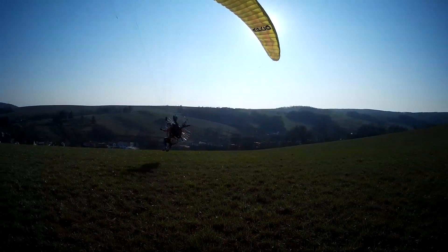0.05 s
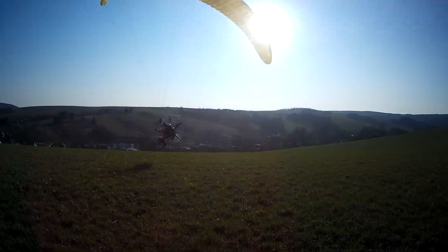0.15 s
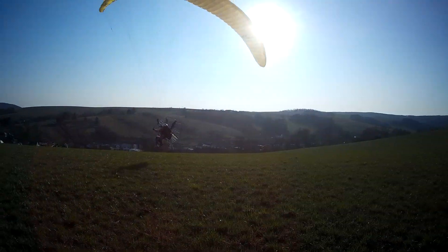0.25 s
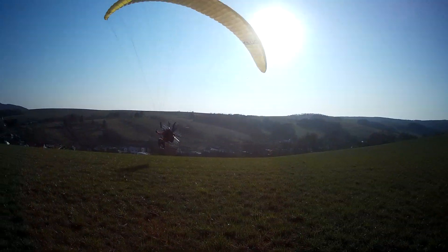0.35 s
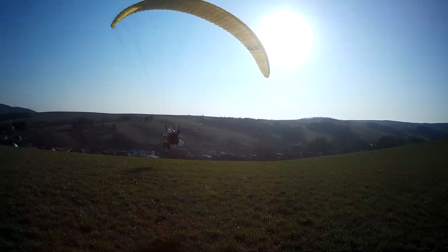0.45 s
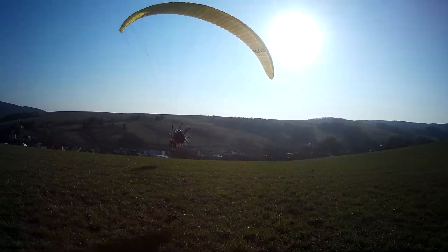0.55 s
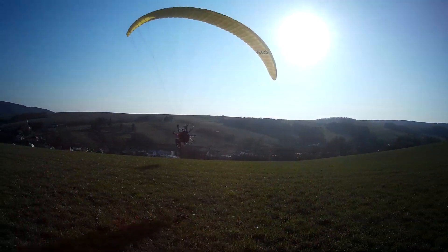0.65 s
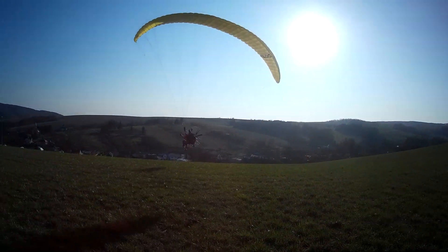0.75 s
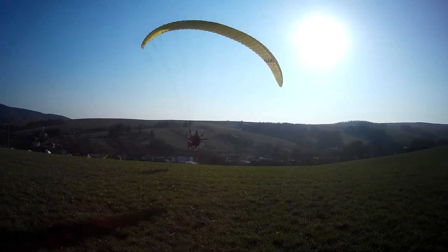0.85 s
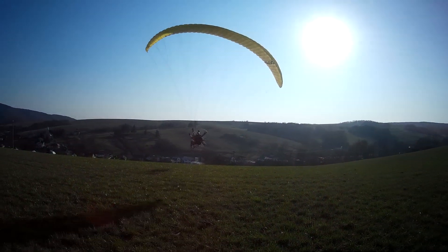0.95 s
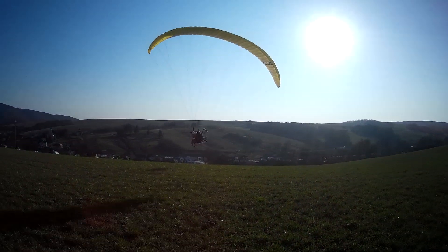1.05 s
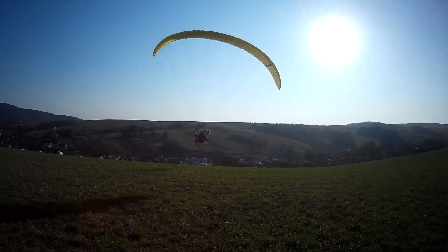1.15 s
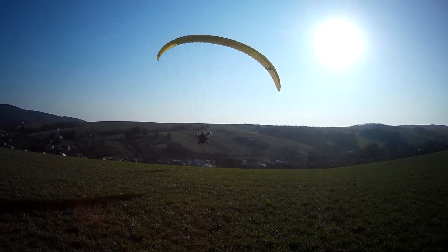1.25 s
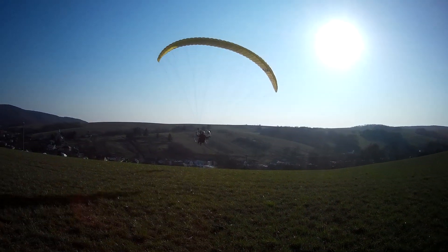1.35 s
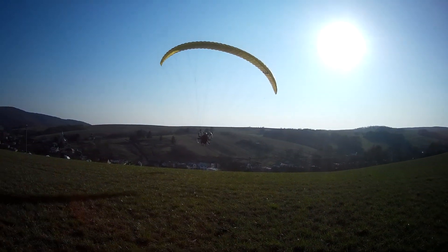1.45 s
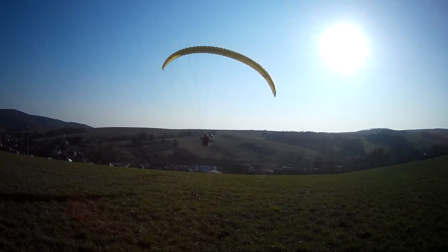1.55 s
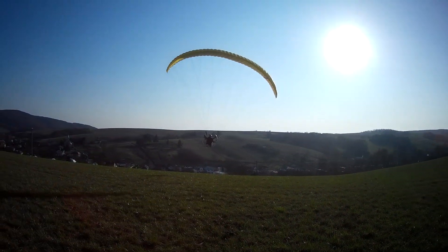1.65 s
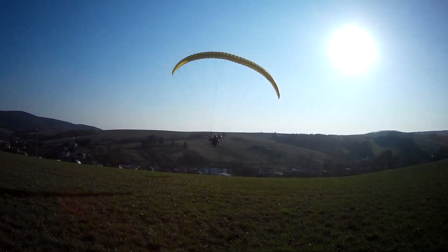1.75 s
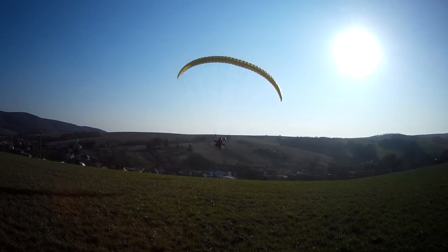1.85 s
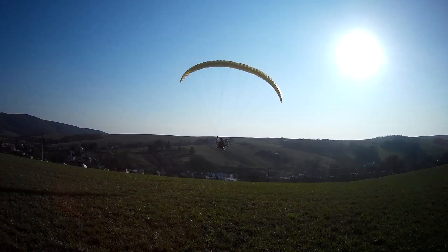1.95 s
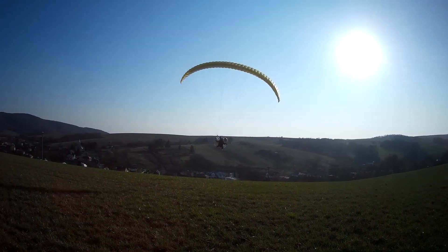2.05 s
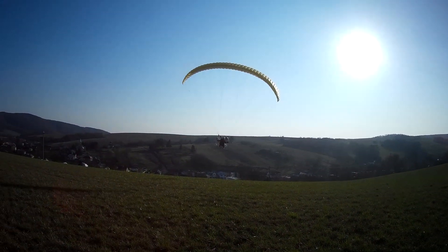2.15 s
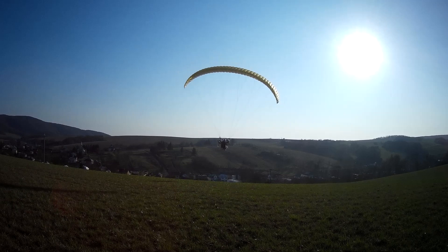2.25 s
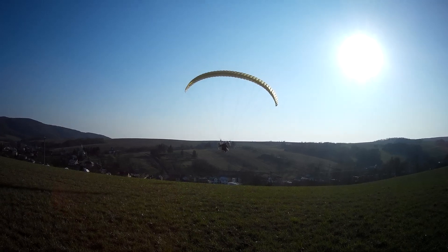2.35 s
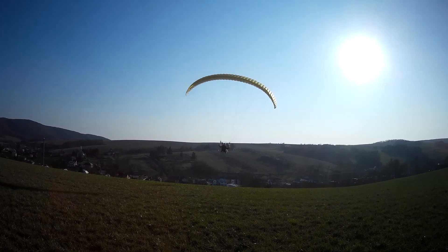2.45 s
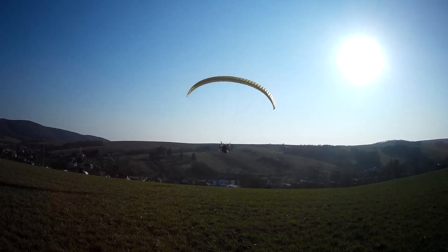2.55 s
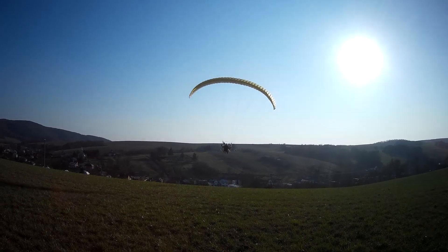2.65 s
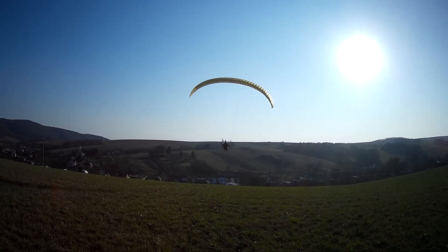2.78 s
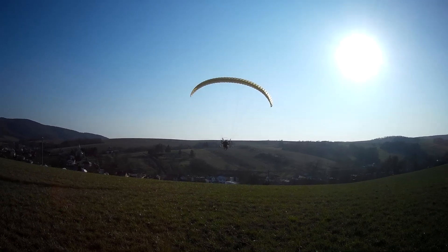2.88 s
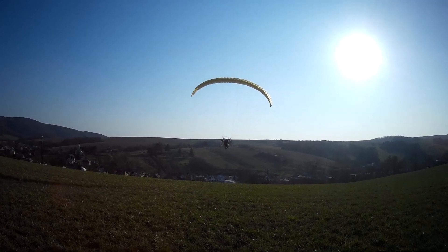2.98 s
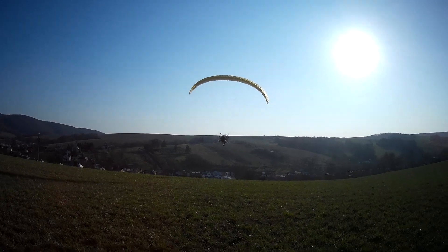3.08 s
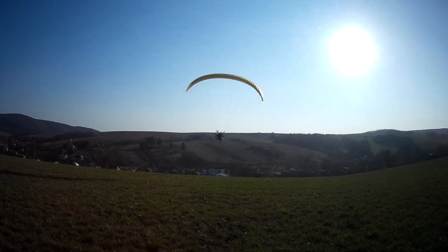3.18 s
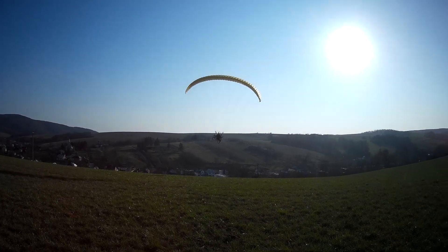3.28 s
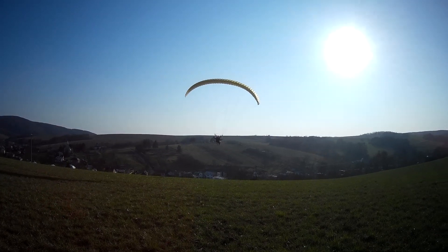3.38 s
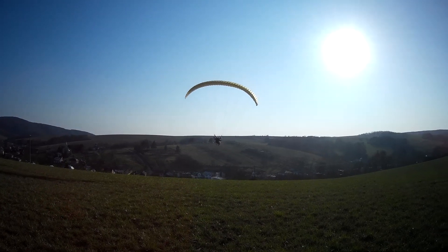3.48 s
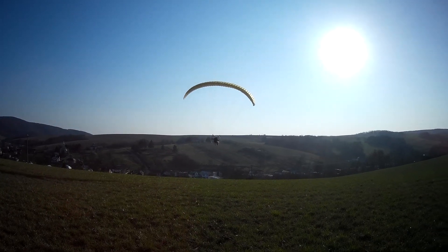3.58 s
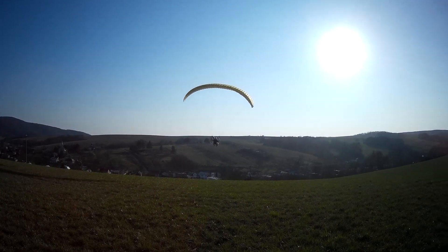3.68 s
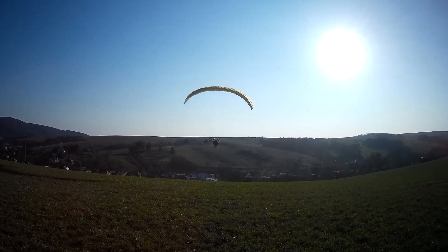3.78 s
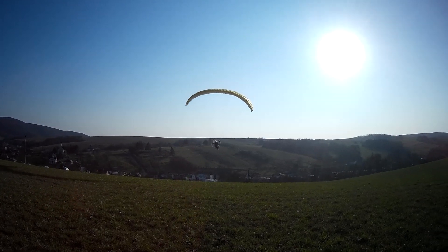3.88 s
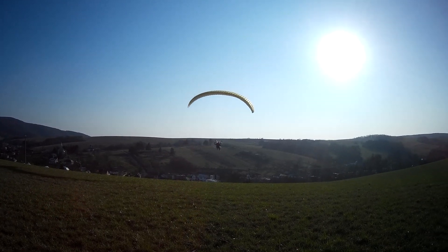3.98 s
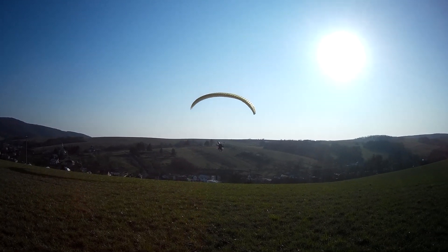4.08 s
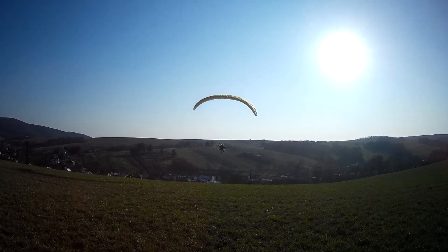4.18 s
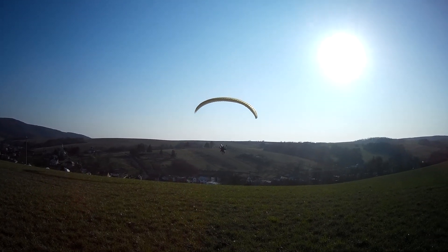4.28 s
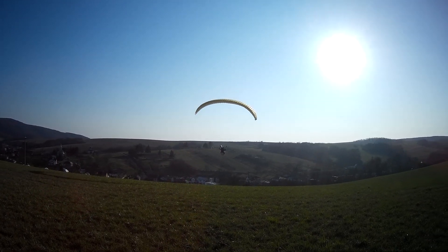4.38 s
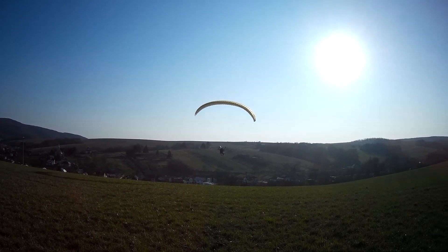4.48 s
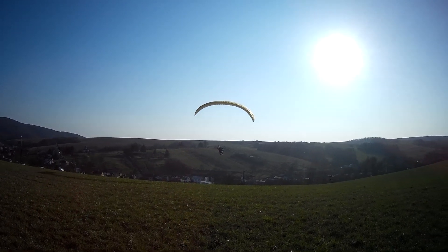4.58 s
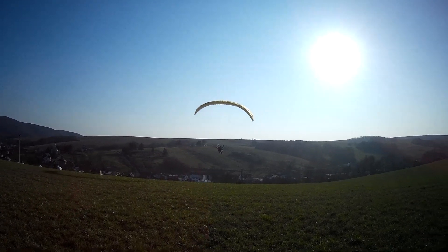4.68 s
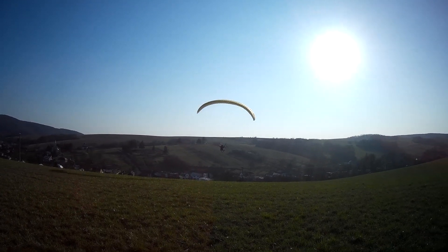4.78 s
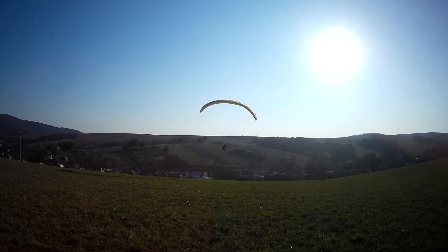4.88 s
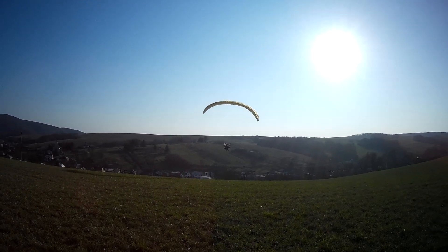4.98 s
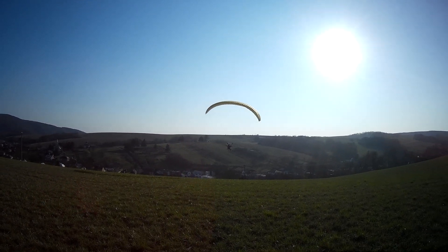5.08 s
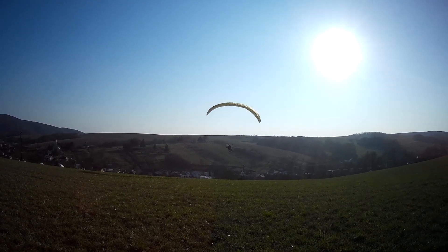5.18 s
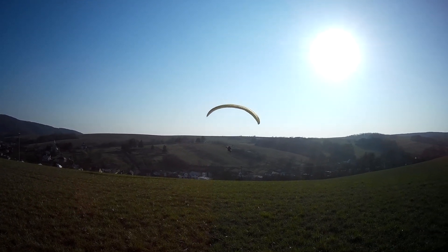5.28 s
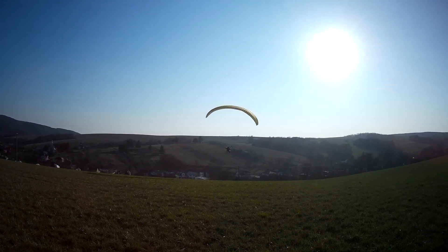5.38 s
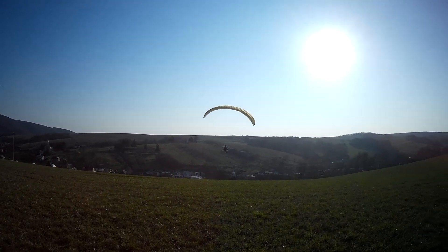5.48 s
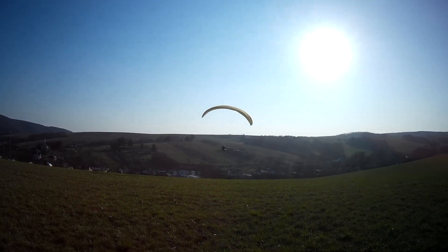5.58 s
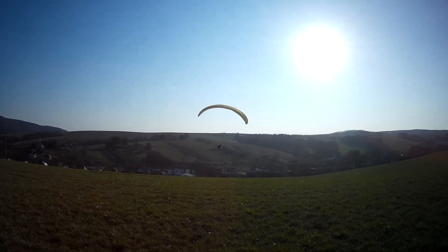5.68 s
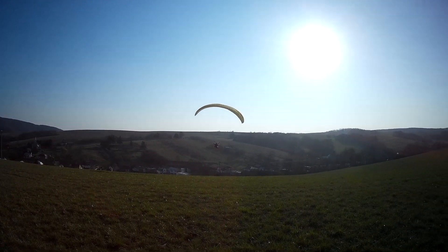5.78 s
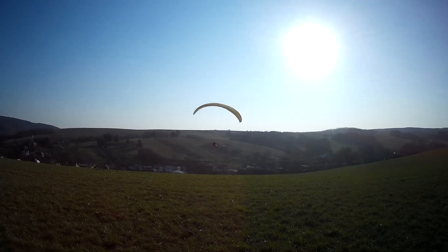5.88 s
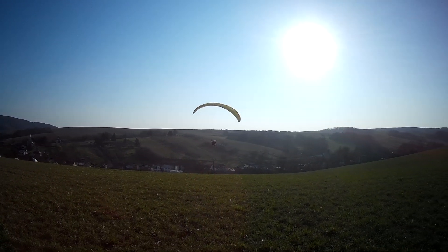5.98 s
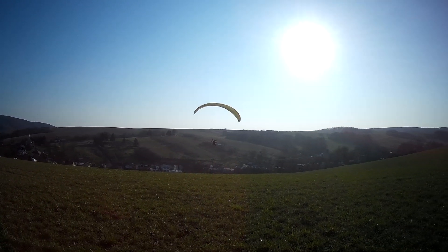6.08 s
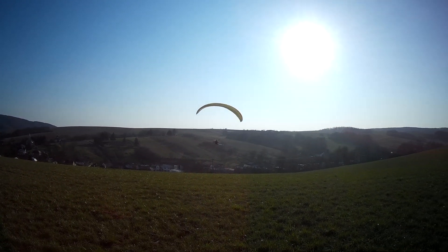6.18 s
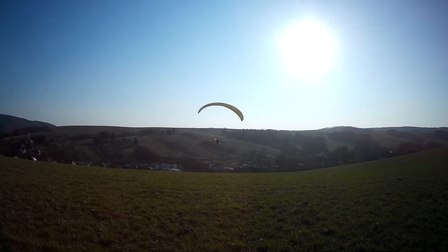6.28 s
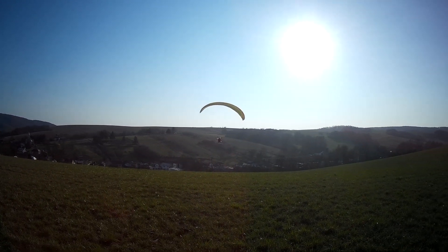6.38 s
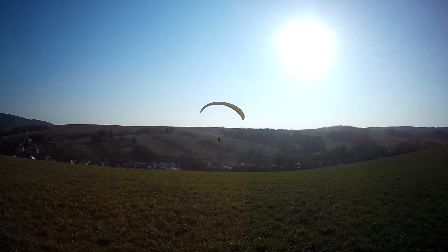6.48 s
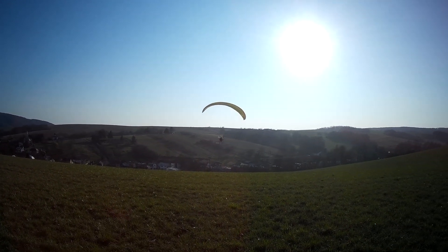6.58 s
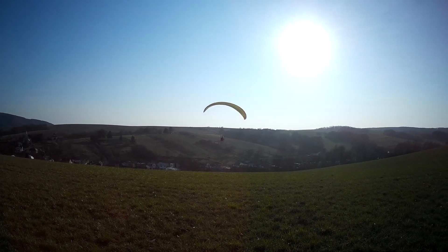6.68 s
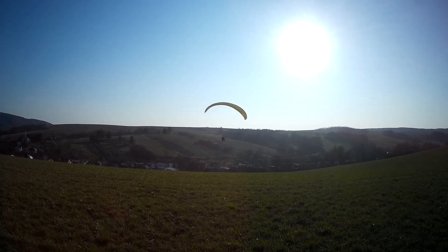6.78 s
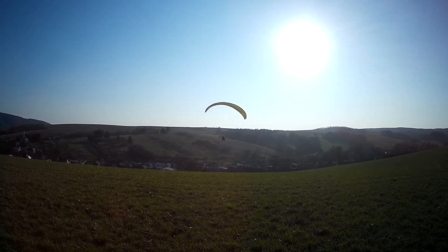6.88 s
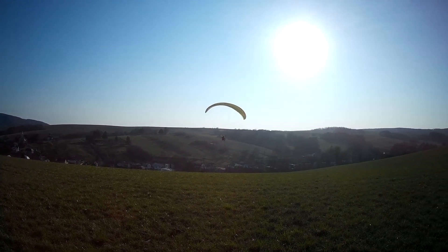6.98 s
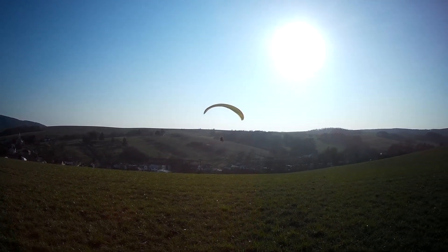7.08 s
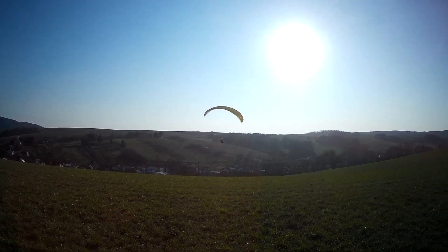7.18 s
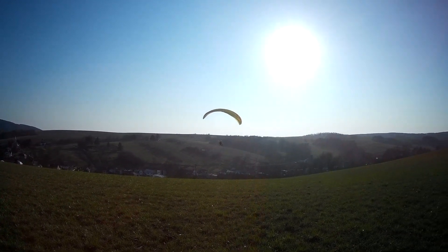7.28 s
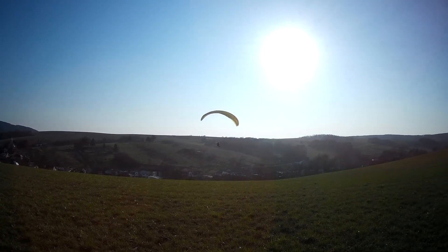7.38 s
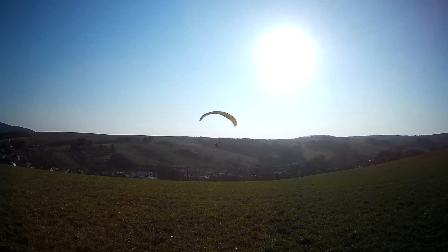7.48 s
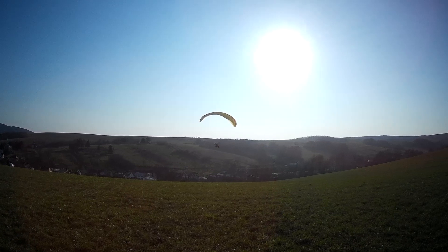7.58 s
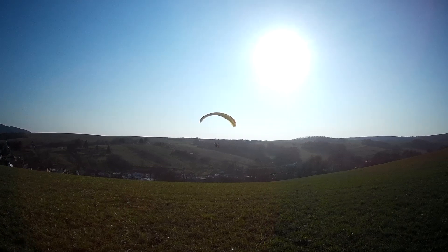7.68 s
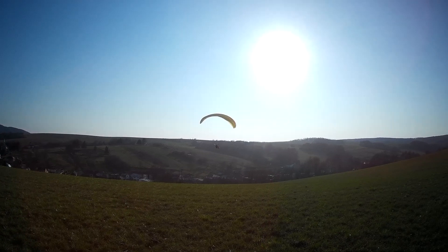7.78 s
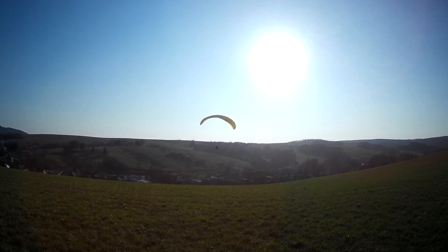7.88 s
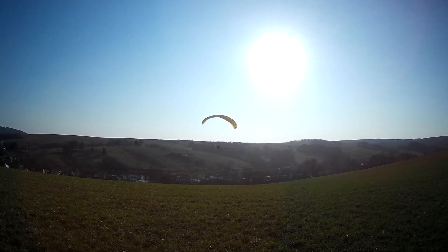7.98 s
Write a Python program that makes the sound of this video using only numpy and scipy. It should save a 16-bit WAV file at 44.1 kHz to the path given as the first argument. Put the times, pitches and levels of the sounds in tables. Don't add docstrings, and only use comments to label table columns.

```python
import sys
import numpy as np
from scipy import signal
from scipy.fft import rfft, irfft, next_fast_len
from scipy.io import wavfile
from scipy.ndimage import uniform_filter1d

SR = 44100
rng = np.random.default_rng(int(sys.argv[2]) if len(sys.argv) > 2 else 0)


def master_out(mix):
    frames = np.transpose(np.atleast_2d(mix))
    ceiling = np.clip(frames, -1, 1)
    pcm = np.round(ceiling * 32767).astype(np.int16)
    wavfile.write(sys.argv[1], SR, pcm)


def decibels_to_gain(level_db):
    exponent = np.asarray(level_db, float) / 20
    return 10 ** exponent


N = 355005
STEP = 128
COOL_S = 0.83


def evened(x):
    return x / np.sqrt(np.mean(x ** 2) + 1e-20)


def read(points, hz):
    f, value = np.transpose(points)
    return np.interp(np.log(hz + 1), np.log(f + 1), value)


def columns(rows, t):
    s, *values = np.transpose(rows)
    return [np.interp(t, s, v) for v in values]


def control_times():
    return np.arange(N // STEP + 2) * STEP / SR


def swell(t, s, half_s):
    return np.exp(-np.square(np.square((t - s) / half_s)))


def rise(t, s, width_s):
    return 1 / (1 + np.exp((s - t) / width_s))


def wander(rate_hz, count):
    width = max(int(SR / STEP / rate_hz), 1)
    x = rng.standard_normal((count, N // STEP + 2))
    return evened(uniform_filter1d(uniform_filter1d(x, width), width))


def noise(points, patchy_db):
    hz = np.fft.rfftfreq(1024, 1 / SR)
    a, b, patches = rng.standard_normal((N // 256 + 5, 513, 3)).T
    patches = evened(uniform_filter1d(uniform_filter1d(patches, 9, 0), 14, 1))
    z = (a + 1j * b) * decibels_to_gain(read(points, hz)[:, None] + patchy_db * patches)
    return evened(signal.istft(z, nperseg=1024, noverlap=768)[1][:N])


def band(x, lo_hz, hi_hz):
    size = next_fast_len(N)
    hz = np.fft.rfftfreq(size, 1 / SR) + 1
    gain = 1 / (1 + (lo_hz / hz) ** 12) / (1 + (hz / hi_hz) ** 12)
    part = irfft(rfft(x, size) * gain, size)[:N]
    return part / np.sqrt(uniform_filter1d(part ** 2, SR // 3, mode="reflect") + 1e-20)


def stack(turns, size, lag, orders, fade_db, drift):
    fades, drifts = wander(7.8, len(orders)), wander(9.0, len(orders))
    out, at = np.zeros(N), np.arange(N) / STEP
    first = np.exp(2j * np.pi * turns)
    wave = first ** orders[0]
    for k, fade, slip in zip(orders, fades, drifts):
        phase = drift * k * slip - 2 * np.pi * lag(k)
        slow = size(k) * decibels_to_gain(fade_db * fade) * np.exp(1j * phase)
        out += (np.interp(at, np.arange(len(slow)), slow) * wave).real
        wave = wave * first
    return out


# (time [s], firing rate [Hz])
THROTTLE = [(0, 117.77), (.38, 116.38), (1.12, 94.48), (1.37, 89.85), (2.06, 84.53), (2.9, 91.25),
            (3.39, 69.56), (3.78, 81.48), (4.11, 81.92), (4.4, 85.24), (4.74, 85.02), (5.04, 82.17),
            (5.46, 94.73), (5.72, 98.39), (6.39, 77.39), (6.9, 77.74), (7.06, 74.16), (8.05, 71.46)]
INERTIA_S = .125
GEAR, BLADE_LAG_S, CREEP_HZ_PER_S = 1.04567, .0146, .0078
SLIP_HZ, GRIP_AT_S, GRIP_S = 3.21, .521, .2


def speeds(t):
    width = round(INERTIA_S / (t[1] - t[0]))
    fire_hz = columns(THROTTLE, t)[0]
    for _ in range(2):
        fire_hz = uniform_filter1d(fire_hz, width, mode="nearest")
    slip_hz = SLIP_HZ * rise(-t, -GRIP_AT_S, GRIP_S) + CREEP_HZ_PER_S * t
    return GEAR * fire_hz - BLADE_LAG_S * np.gradient(fire_hz, t) - slip_hz, fire_hz


def shafts():
    t = control_times()
    blade_hz, fire_hz = (np.interp(np.arange(N) / SR, t, hz) for hz in speeds(t))
    return np.cumsum(blade_hz) / SR + .84, np.cumsum(fire_hz) / SR + .29


# (time [s], level [dB], clear line of sight to the engine [dB], pipe mouth facing the listener [dB])
FLIGHT = [(0, -9.5, 4, 10), (.35, -12, 4, -1), (1, -17, 0, -14), (1.25, -17, -3.5, -18),
          (1.9, -19.5, 4.5, 1), (2.75, -21, 5, -41), (3.3, -24.5, -3, -3), (3.65, -24.5, -2.5, -6),
          (3.8, -24.5, 2.5, 9), (4.15, -24.5, 0.5, 15.5), (4.68, -25, -0.5, -5), (5.05, -21.5, -3, -25),
          (5.6, -25, 3.5, -13), (6.1, -28.5, 4, -19), (6.5, -26.5, -1, 12), (7, -23.5, -1, 24),
          (7.4, -24.5, -5, 20), (8.05, -28, -2, 17.5)]


def flight(t):
    return columns(FLIGHT, t)


def eddies(t):
    return 1 - 0.4 * swell(t, 0, COOL_S)


def blade_lag(k):
    return 0.27 * (k % 2) + 0.01121 * (k - 2) ** 2 if k > 1 else -.15


# (frequency [Hz], level [dB])
BLADES = [(300, -49), (455, -20), (510, -13.5), (555, -8), (720, -5.5), (900, -11), (1200, -10),
          (1650, -13.5), (2100, -20.5), (2700, -38), (3100, -31.5), (3600, -38)]
BLADE_DB, MOUTH_MASKS = -2, 0.11


def blade_tones(turns):
    t = control_times()
    blade_hz = speeds(t)[0]
    blade_db = BLADE_DB - MOUTH_MASKS * flight(t)[2]
    odd_db = np.interp(t, [0, 1, 2.5, 6, 7], [4.5, -4, -6.0, -2.5, -7])
    stretch = 0.97 + 0.014 * t

    def size(k):
        return decibels_to_gain(read(BLADES, k * blade_hz / stretch) + blade_db + odd_db * (k % 2))

    return stack(turns, size, blade_lag, range(5, 28), 2.0 * eddies(t), 0.041 * eddies(t))


def fire_lag(k):
    return 0.01638 * (k - 2) ** 2


# (frequency [Hz], level [dB])
EXHAUST = [(300, 7.5), (450, -35), (560, -21.5), (700, -32), (850, -10.5), (1200, -11.5), (1700, -26),
           (2100, -55), (2700, -47), (3100, -55), (3600, -45)]
# (frequency [Hz], width [Hz], level [dB])
PIPE = [
    (647, 64, 4),
    (1406.4, 80, -13.5),
]
FIRE_DB, HOT_FIRE_DB, FIRE_LOSS_DB_PER_S = -2.5, 3, 1.01
HOT_TUNE = 0.16
SAG_TUNE, SAG_AT_S, SAG_S = 0.061, 1.14, 0.3


def exhaust_tones(turns):
    t = control_times()
    fire_hz, mouth_db = speeds(t)[1], flight(t)[2]
    hot = swell(t, 0, COOL_S)
    fire_db = FIRE_DB + HOT_FIRE_DB * hot - FIRE_LOSS_DB_PER_S * t
    tune = 1 + HOT_TUNE * hot - SAG_TUNE * swell(t, SAG_AT_S, SAG_S)

    def size(k):
        ring = 0
        for n, (hz, width_hz, db) in enumerate(PIPE):
            detune = 2 * (k * fire_hz - hz * tune ** (1 - n)) / width_hz
            ring = ring + decibels_to_gain(db + n * mouth_db) / (1 + detune ** 2)
        return (decibels_to_gain(read(EXHAUST, k * fire_hz)) + ring) * decibels_to_gain(fire_db)

    return stack(turns, size, fire_lag, range(5, 28), 2.75 * eddies(t), 0.042 * eddies(t))


def puff_train(blade_turns, fire_turns):
    puffs = np.zeros(N)
    for turns in (2 * blade_turns, fire_turns):
        strength = decibels_to_gain(2.2 * rng.standard_normal(1800))
        puffs += np.exp(-(turns % 1) / 0.4) * strength[turns.astype(int)]
    return uniform_filter1d(puffs, 40)


# (frequency [Hz], density [dB per Hz])
RUSH = [(30, -36), (60, -46), (120, -26), (250, -21), (420, -21), (560, -11.5), (700, -4.5), (1000, -6.5),
        (1300, -3.5), (1650, -2), (1950, -11.5), (2300, -16.5), (2800, -46.5)]


def air_rush(puffs):
    return decibels_to_gain(-4.5) * noise(RUSH, 1.2) * evened(.4 + puffs)


# (time [s], half length [s], intake gain [dB], fizz gain [dB])
FACING = [
    (2.65, 0.46, 3.5, 2),
    (3.9, .15, -6, 10),
]


def facing(t):
    bells = [(swell(t, s, half_s), intake_db, fizz_db) for s, half_s, intake_db, fizz_db in FACING]
    return sum(b * db for b, db, _ in bells), sum(b * db for b, _, db in bells)


# (frequency [Hz], density [dB per Hz])
WHISTLE = [(2600, -37), (2950, -8.5), (3200, -4), (3340, -5), (3480, -9), (3650, -50)]
INTAKE_DB, INTAKE_GAIN_DB_PER_S, INTAKE_SHUT_S = -22.5, 3.5, 7.16


def intake():
    t = np.arange(N) / SR
    shut_db = -16 * rise(t, INTAKE_SHUT_S, 0.1)
    level_db = INTAKE_DB + INTAKE_GAIN_DB_PER_S * t + 0.59 * flight(t)[1] + shut_db + facing(t)[0]
    return decibels_to_gain(level_db) * noise(WHISTLE, 1.4)


# (frequency [Hz], density [dB per Hz])
RASP = [(1800, -16), (2300, -7.5), (2750, -3), (3050, -4), (3350, -4.5), (3650, -11.5), (3900, -11),
        (4300, -8.5), (4800, -9), (5200, -13.5), (5550, -15), (6000, -23.5), (6600, -41)]


def engine_rasp(puffs):
    return decibels_to_gain(-25.5) * (noise(RASP, 1.7) + intake()) * evened(0.5 + puffs)


# (frequency [Hz], density [dB per Hz])
FIZZ = [(5200, -32), (6200, -2), (6700, 1), (7400, 4), (7900, 0.5), (8600, 8), (9750, -18), (10500, 4.5),
        (11200, -4.5), (12300, 3), (13300, 1), (14500, -14), (15500, -26), (17000, -48)]


def tip_fizz(puffs):
    return noise(FIZZ, 1.5) * evened(.6 + puffs)


def paramotor():
    blade_turns, fire_turns = shafts()
    tones = blade_tones(blade_turns) + exhaust_tones(fire_turns)
    puffs = puff_train(blade_turns, fire_turns)
    tones = tones * evened(5.5 + puffs)
    return tones + air_rush(puffs), engine_rasp(puffs), tip_fizz(puffs)


# (time [s], half length [s], level against the rasp [dB])
SQUEALS = [
    (2.3, .07, -12),
    (3.07, .07, -14),
    (3.82, .05, -4),
    (3.9, .05, -10),
]
SQUEAL_HZ, SQUEAL_WIDTH_HZ = 3330, 50


def squeal():
    t = np.arange(N) / SR
    r = np.exp(-np.pi * SQUEAL_WIDTH_HZ / SR)
    rough = signal.lfilter([1], [1, -2 * r, r * r], rng.standard_normal((2, N)))
    angle = 2 * np.pi * SQUEAL_HZ * t
    tone = evened(rough[0] * np.cos(angle) + rough[1] * np.sin(angle))
    return sum(decibels_to_gain(db) * swell(t, s, half_s) for s, half_s, db in SQUEALS) * tone


TREBLE_DB, FIZZ_DB, BROW_DB = -22, -38, -11
FIZZ_SIGHT, BROW_SIGHT = 1.1, 0.88
AIR_DB_PER_S = 3
DULL_DB, DULL_AT_S = 1, 7.55


def path(body, rasp, fizz):
    t = np.arange(N) / SR
    level_db, sight_db, _ = flight(t)
    fizz_db = FIZZ_DB + FIZZ_SIGHT * sight_db - AIR_DB_PER_S * t + facing(t)[1]
    parts = band(body, 45, 1400)
    parts += decibels_to_gain(BROW_DB + BROW_SIGHT * sight_db) * band(body, 1760, 1568)
    parts += decibels_to_gain(TREBLE_DB + sight_db) * (band(body + rasp, 2196, 10100) + squeal())
    parts += decibels_to_gain(TREBLE_DB + DULL_DB) * rise(t, DULL_AT_S, .35) * band(rasp, 1960, 2280)
    parts += decibels_to_gain(fizz_db) * fizz
    return decibels_to_gain(level_db - 1.18) * parts


DOUBLED_S = 0.75


def receding(rows, t):
    return [db - loss_db * np.log2(1 + t / DOUBLED_S) + echo_db * swell(t, s, half_s)
            for db, loss_db, s, half_s, echo_db in rows]


# (starting peak [dB], loss per doubling of distance [dB], ground echo time [s],
# half length [s], echo gain [dB])
BLADE_HUM = [
    (-39.5, 2.5, 0.15, 0.77, 14.5),
    (-20.5, 9, 0.46, 0.41, 7),
    (-24, 11, 0.58, 0.21, -15),
]
FIRE_HUM = [
    (-23, 6.3, 0.74, .3, -18),
    (-42, 0.64, 4.17, 0.44, -24),
]


def hum():
    t = control_times()
    blade1, blade2, blade3 = receding(BLADE_HUM, t)
    fire2, fire3 = receding(FIRE_HUM, t)
    far_db = np.interp(t, [0, 1, 2.5, 8], [-20.0, -6.0, -1.0, 2])
    blade_db = [blade1, blade2, blade3, blade2 + far_db]
    fire_db = [blade1 - np.clip(13.0 * t, 0, 5.0), fire2, fire3, fire2 + far_db - 3.5]
    blade_turns, fire_turns = shafts()
    blades = stack(blade_turns, lambda k: decibels_to_gain(blade_db[k - 1]), blade_lag, range(1, 5), 0.3, 0.056)
    return blades + stack(fire_turns, lambda k: decibels_to_gain(fire_db[k - 1]), fire_lag, range(1, 5), 0.2, 0.058)


# (time [s], half length [s], level above the breeze [dB])
GUSTS = [(1.6, .15, 4.5), (2.9, 0.15, 4), (4.3, 0.15, 3), (5.052, 0.031, 8), (5.492, 0.33, 10),
         (5.92, .12, 3.5), (6.47, 0.079, -1), (6.64, 0.34, 7.5), (6.84, .025, 7.5), (7.306, 0.12, -1),
         (7.87, 0.13, 8)]
# (frequency [Hz], density [dB per Hz])
WIND = [(15, -2), (30, -16.5), (60, 2.5), (120, -8), (200, -7), (300, -15), (600, -41), (1500, -110)]
BREEZE_DB, LULL_DB, LULL_S = -52.5, -12, 0.3


def wind():
    t = np.arange(N) / SR
    gust_db = BREEZE_DB + LULL_DB * swell(t, LULL_S, 0.28)
    gust_db += sum(db * swell(t, s, half_s) for s, half_s, db in GUSTS)
    lumps = np.interp(np.arange(N) / STEP, np.arange(N // STEP + 2), wander(25.0, count=1)[0])
    return decibels_to_gain(gust_db + 6.0 + 2.1 * lumps) * noise(WIND, 1.3)


def scene():
    return (path(*paramotor()) + hum() + wind())[None]


# (frequency [Hz], density [dB per Hz])
HISS = [(1500, -4), (3000, 3), (6000, 5.5), (9000, 2), (14300, 1.5), (15500, -3), (16500, -11),
        (18000, -28)]
HISS_DB = -61.5


def preamplifier(dry):
    return np.clip(dry + decibels_to_gain(HISS_DB) * noise(HISS, .3), -1, 1)


def band_limit(x):
    return signal.sosfilt(signal.butter(12, 16500, fs=SR, output="sos"), x)


def record(dry):
    mix = preamplifier(dry)
    return band_limit(mix)


dry = scene()
out = record(dry)
master_out(out)
```